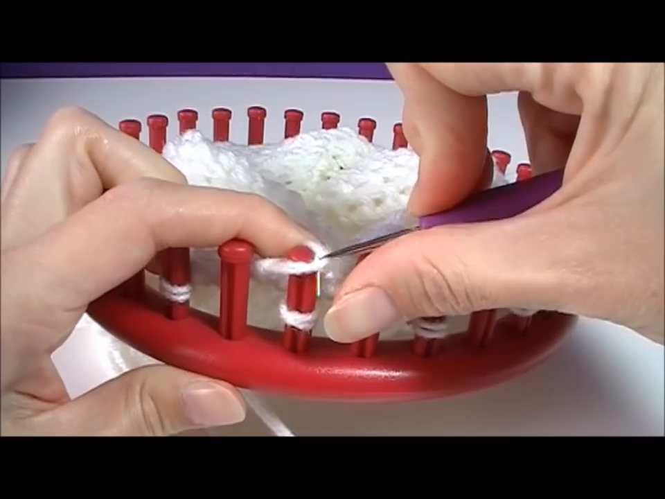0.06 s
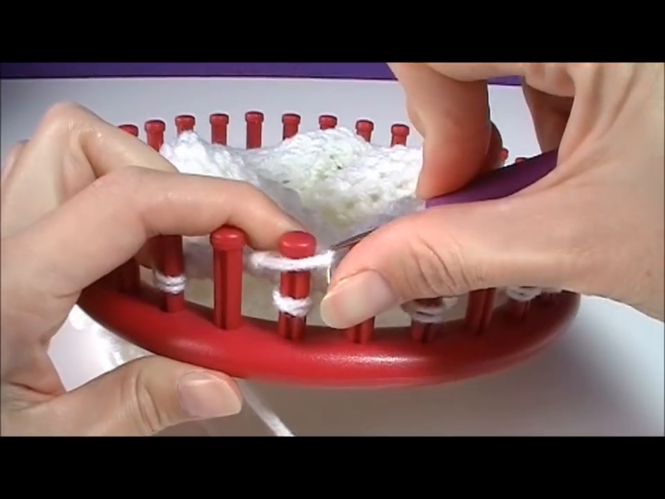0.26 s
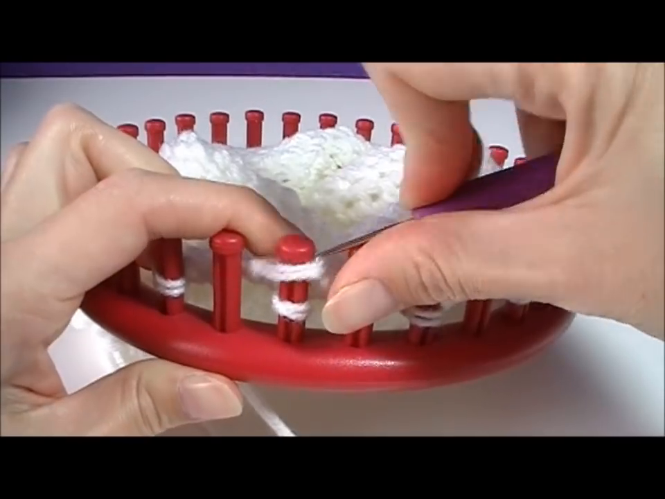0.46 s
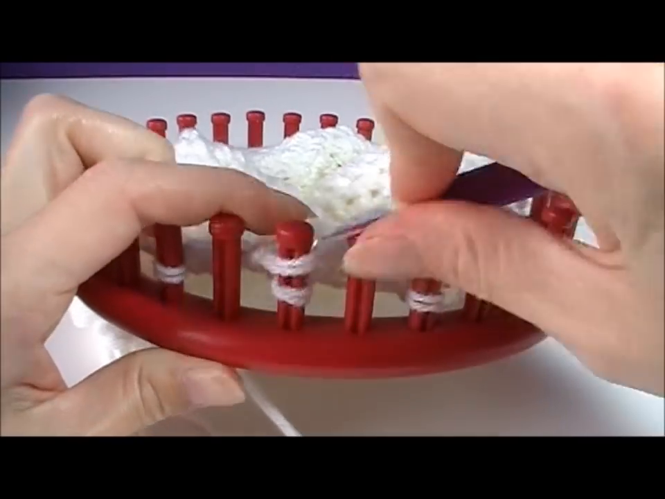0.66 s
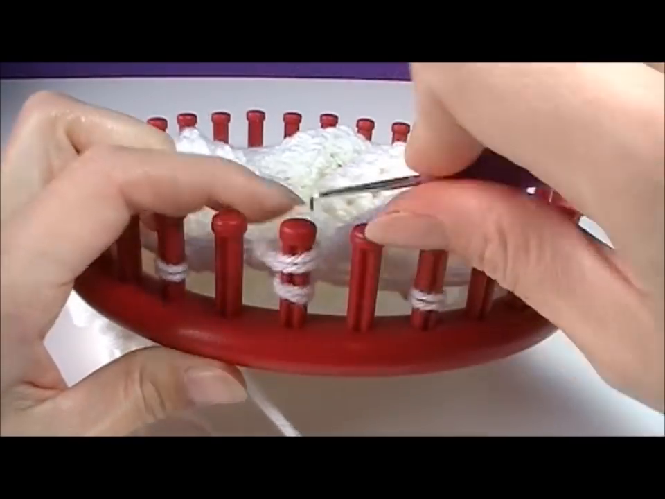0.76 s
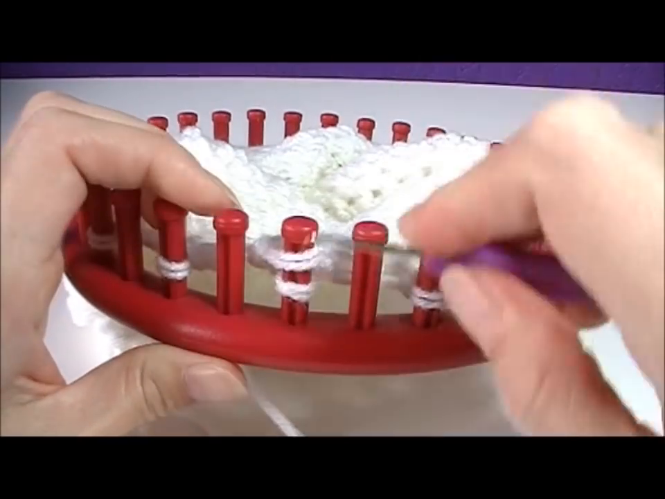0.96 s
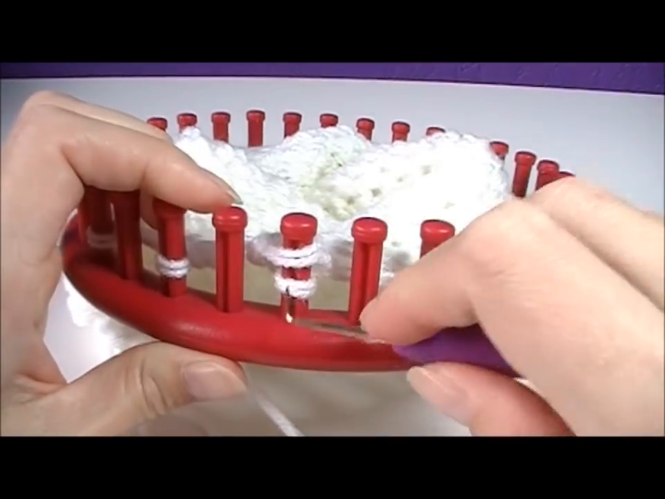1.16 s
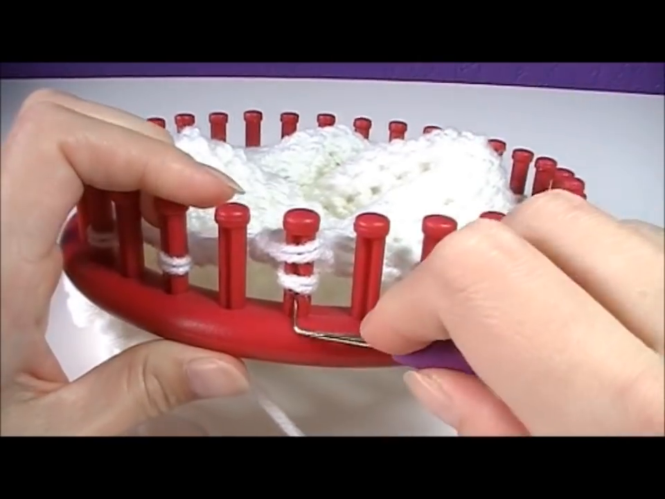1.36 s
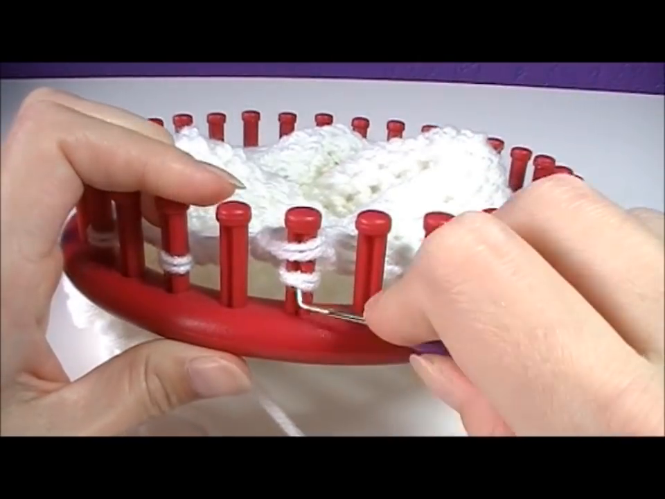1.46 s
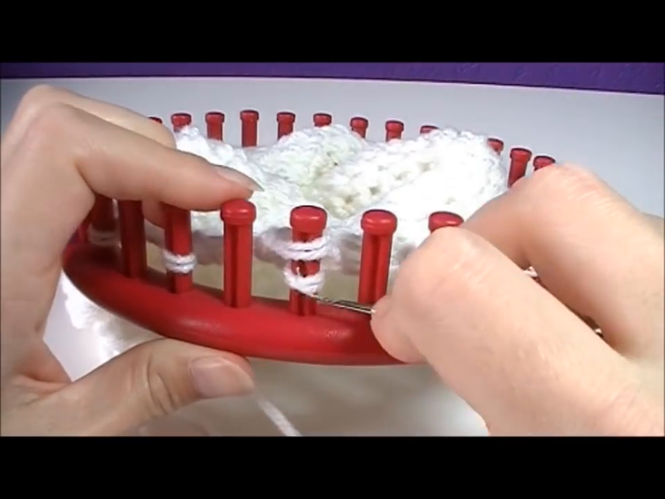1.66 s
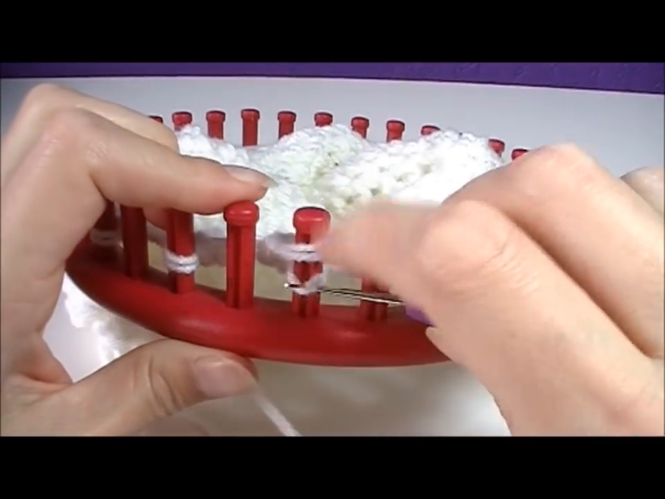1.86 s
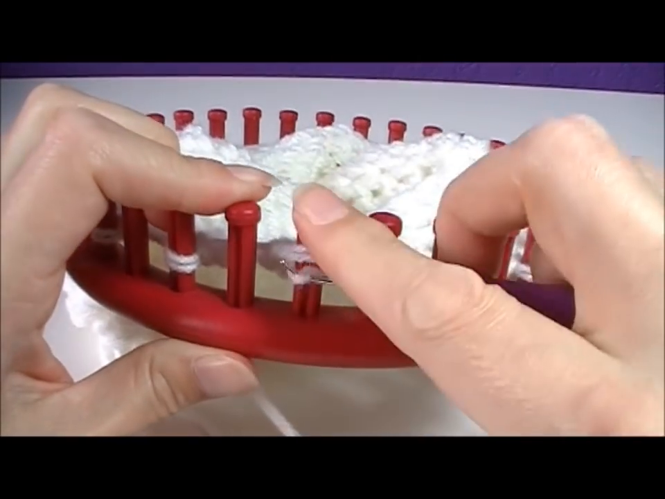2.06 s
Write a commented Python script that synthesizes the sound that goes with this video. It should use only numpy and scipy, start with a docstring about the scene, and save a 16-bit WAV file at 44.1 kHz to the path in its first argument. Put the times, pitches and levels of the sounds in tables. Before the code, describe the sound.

A metal hook clicks on plastic loom pegs, with hollow knocks and faint yarn rubbing.

```python
"""Knitting loom, close up

A small, quiet room, the microphone close to a plastic loom. A metal hook lifts yarn loops over the
pegs, snapping off them and ticking against them; the hollow ring knocks and booms under the hands.
Yarn hisses as it rubs over pegs and fingers, and the hook scrapes once along a groove."""
import sys
import numpy as np
from scipy import signal
from scipy.fft import rfft, irfft, next_fast_len
from scipy.io import wavfile
from scipy.ndimage import map_coordinates

SR = 44100
rng = np.random.default_rng(int(sys.argv[2]) if len(sys.argv) > 2 else 0)


def persist_wave(psi):
    """Save psi, clipped to +-1, as 16-bit WAV."""
    counts = np.round(np.clip(psi, -1, 1) * 32767).astype(np.int16)
    wavfile.write(sys.argv[1], SR, np.atleast_2d(counts).T)


N = 92610  # 2.1 s


def amp(db):
    """Decibels to gain."""
    return 10 ** (np.asarray(db) / 20)


def unit_rms(x):
    """Scale to rms 1."""
    return x / np.sqrt(np.mean(x ** 2) + 1e-20)


def along(points, hz):
    """Read (f/Hz, value) points on a log frequency axis."""
    freqs, values = np.transpose(points)
    return np.interp(np.log(hz + 1), np.log(np.abs(freqs) + 1), values)


def curve(points):
    """Join (t/s, value) points sample by sample, holding the end values."""
    return np.interp(np.arange(N) / SR, *np.transpose(points))


def wobble(per_s):
    """A smooth random curve with per_s knots a second."""
    return map_coordinates(rng.standard_normal(N), [np.arange(N) * per_s / SR], mode="wrap")


def filtered(x, response):
    """Shape x by a response given as a function of frequency."""
    n = x.shape[-1]
    padded = next_fast_len(2 * n)
    return irfft(rfft(x, padded) * response(np.fft.rfftfreq(padded, 1 / SR)), padded)[..., :n]


def pan(db):
    """Gains that put the left channel db above the right."""
    return amp(np.array([[db], [-db]]) / 2)


def add(track, start_s, sound):
    """Mix a sound in at start_s."""
    part = track[:, max(0, round(start_s * SR)):][:, :sound.shape[-1]]
    part += sound[..., :part.shape[1]]


def noise(colour, alike):
    """Stereo noise of rms 1, from colour (f/Hz, level/dB) and alike (f/Hz, left-right correlation)."""
    def mid_side_gains(hz):
        angle = np.arccos(np.clip(along(alike, hz), -1, 1)) / 2
        return amp(along(colour, hz)) * [np.cos(angle), np.sin(angle)]
    mid, side = filtered(rng.standard_normal((2, N)), mid_side_gains)
    return unit_rms(np.array([mid + side, mid - side]))


# room tone at the microphone: f/Hz, level/dB
ROOM_COLOUR = [(25, -2), (55, -10), (110, 2.5), (170, -8.5), (250, 3), (400, -6), (800, -5.5),
               (1700, -12.5), (3500, -19), (7000, -25), (12000, -33.5), (15500, -28.5)]
# its likeness across the stereo pair: f/Hz, correlation
ROOM_ALIKE = [(60, -0.36), (240, -0.81), (950, -0.87), (3770, -0.17), (15000, -0.42)]
def room_tone():
    """The small room's steady, low background noise."""
    return amp(-48) * noise(ROOM_COLOUR, ROOM_ALIKE) * pan(db=1.3)


def fibre_friction(colour, alike):
    """Fibres catch and slip, giving their hiss a fine grain."""
    flutter_db = 2 * wobble(per_s=700)
    return unit_rms(amp(flutter_db) * noise(colour, alike))


# yarn sliding over the pegs, close up: t/s, level/dB
SLIDE_LEVEL = [(0, -53), (.13, -56.5), (.18, -53.5), (.24, -46), (.32, -58), (.42, -76), (.48, -59),
               (.56, -57), (.75, -53.5), (.81, -59.5), (.95, -52.5), (1.1, -61), (1.35, -60.5), (1.45, -60),
               (1.55, -57.5), (1.76, -56), (1.85, -52.5), (1.91, -58), (1.99, -53), (2.1, -49)]
# its spectrum: f/Hz, level/dB
SLIDE_COLOUR = [(300, -4), (1000, 3), (2000, -2), (3500, 0.5), (6000, -2.5), (9000, -3.5), (12000, -2),
                (15500, -5)]
def yarn_slide():
    """Yarn rubs on the plastic with a broad, grainy hiss."""
    hiss = fibre_friction(SLIDE_COLOUR, alike=[(1000, 0.19), (10000, 0.28)])
    return amp(0.5 + curve(SLIDE_LEVEL)) * hiss * pan(db=1.5)


# hands on the ring, just left of centre: t/s, level/dB
HAND_LEVEL = [(0, -55), (.2, -50.5), (.42, -61.5), (.6, -52.5), (.72, -54), (.9, -57), (1.15, -55),
              (1.3, -58), (1.5, -50.5), (1.6, -52.5), (1.78, -50), (1.92, -50.5), (2.0, -50), (2.1, -55.5)]
# their spectrum: f/Hz, level/dB
HAND_COLOUR = [(30, -26), (70, -2), (120, 1.5), (200, -1), (270, -6), (350, -4.5), (550, -13), (800, -17),
               (1400, -24), (4000, -49)]
def hand_rumble():
    """Fingers shift on the ring with an uneven low rumble."""
    level_db = curve(HAND_LEVEL) + 2.3 * wobble(per_s=35)
    return amp(level_db) * noise(HAND_COLOUR, alike=[(100, 0), (800, 0)]) * pan(db=2)


# decay of the small room: f/Hz, t60/s
ROOM_DECAY = [(150, 0.16), (1000, 0.22), (5000, 0.17), (14000, 0.095)]
def in_room(sound, wet_db):
    """The direct sound reaches the microphone with a short tail from the walls."""
    hz, t, spectra = signal.stft(rng.standard_normal((2, SR // 3)), SR, nperseg=256)
    tail = signal.istft(spectra * amp(-60 * t / along(ROOM_DECAY, hz)[:, None]), SR)[1]
    tail /= np.linalg.norm(tail[0])
    heard = amp(wet_db) * signal.fftconvolve(sound.mean(0)[None], tail, axes=1)
    add(heard, 0, sound)
    return heard


# knocks on the ring, left of the microphone:
# t/s, boom level/dB, dull above f/Hz, thin below f/Hz, share of free decay, thud level/dB, thud f/Hz
RING_KNOCKS = [(.001, -33.5, 900, 80, 0.52, -39, 418), (0.2333, -24, 1400, 60, 0.083, -22, 336),
               (0.2394, -14.5, 1000, 70, 0.84, -21.5, 430), (0.5061, -28.5, 775, 133, 0.79, -33.5, 437),
               (0.7742, -25.5, 780, 173, 0.73, -32, 444), (1.235, -42.5, 300, 130, 0.5, -39, 244),
               (1.562, -33.5, 363, 95, 1, -45, 130), (1.6202, -32, 370, 190, 0.54, -36, 192),
               (1.672, -27, 520, 199, 0.48, -28.5, 213), (1.694, -30, 338, 166, 0.35, -40, 168),
               (1.7225, -28, 756, 280, 0.51, -40, 332), (1.756, -32, 700, 230, 0.5, -33.5, 312),
               (1.779, -35.5, 300, 80, 0.6, -49, 130), (1.820, -38.5, 340, 90, 0.74, -43, 152),
               (1.9862, -31.5, 333, 79, 0.24, -36.5, 96), (2.007, -45, 250, 60, 0.33, -37, 94)]
# modes of the free ring: f/Hz, level/dB, t60/s
RING_MODES = [(85, -3, 0.08), (127.7, 1, 0.36), (173.5, -14, 0.28), (223, -13.5, 0.075), (321.7, -4, 0.21),
              (382.8, -4.5, .17), (424.6, -11.5, 0.36), (461.4, -5, 0.2), (486, -10.5, 0.19),
              (537, -13.5, 0.06), (738, -0.5, 0.038), (859, -9.5, 0.09), (937, -6.5, 0.065),
              (1202, -13, 0.071)]
BOOM_GAIN_DB, KNOCK_ATTACK_S = -10, 0.00017
THUD_CYCLES = 4.9  # swings in which a thud falls 60 dB
GRIP_SAG = 0.046  # share by which a full grip lowers the ring's pitches
def ring_knocks():
    """The hollow ring thuds and booms; soft contacts are dull, a firm grip shortens and lowers the boom."""
    out, t = np.zeros((2, N)), np.arange(SR // 2) / SR
    hz, db, t60 = np.transpose(RING_MODES)[:, :, None]
    sign = (-1) ** np.arange(len(RING_MODES))[:, None]  # neighbouring modes swing against each other
    radiation = signal.butter(2, 75, "high", fs=SR, output="sos")
    attack = 1 - np.exp(-t / KNOCK_ATTACK_S)
    for start_s, boom_db, dull_hz, thin_hz, decay_share, thud_db, thud_hz in RING_KNOCKS:
        excitation = 1 / np.sqrt((1 + (hz / dull_hz) ** 4) * (1 + (thin_hz / hz) ** 4))
        phase = rng.normal(0, 0.92, hz.shape)
        held_hz = hz * (1 - GRIP_SAG * (1 - decay_share))
        envelopes = amp(BOOM_GAIN_DB + boom_db + db - 60 * t / (t60 * decay_share))
        boom = (sign * excitation * envelopes * np.cos(2 * np.pi * held_hz * t + phase)).sum(0)
        thud = amp(thud_db - 60 * t * thud_hz / THUD_CYCLES) * np.sin(2 * np.pi * thud_hz * t)
        knock = signal.sosfilt(radiation, (boom + thud) * attack)
        add(out, start_s, in_room(pan(db=7.5) * knock, wet_db=-7.5))
    return out


# taut yarn drawn across hook and fingertips: t/s, level/dB
TAUT_LEVEL = [(.12, -78), (.19, -48.5), (.25, -63), (.33, -70), (.45, -63), (.50, -58), (.64, -54),
              (.77, -57.5), (.81, -85), (1.72, -81), (1.83, -57), (1.90, -73), (1.98, -53), (2.1, -49.5)]
# its spectrum: f/Hz, level/dB
TAUT_COLOUR = [(6000, -28), (8500, -4), (10200, 1), (11800, -1.5), (13000, 0), (14000, -5), (15500, -10)]
def taut_yarn():
    """Yarn under tension slips faster and hisses high above the rest."""
    return amp(curve(TAUT_LEVEL)) * fibre_friction(TAUT_COLOUR, alike=[(10000, 0.32)])


# hook on peg, close to the microphone:
# t/s, level/dB, brightest f/Hz, colour width/octaves, left over right/dB, left lead/ms
HOOK_CONTACTS = [(0.2318, -21, 10000, 1.1, 2, 0), (0.233, -13, 8000, 9.5, -4, 0),
                 (0.2366, 0, 7700, 2.28, 4.5, 0.022), (0.501, -3.5, 7260, 0.21, 4.5, -0.037),
                 (0.5011, -13, 5800, 0.21, 5, 0), (0.5016, -13.5, 2900, 0.3, -4, 0.085),
                 (0.562, -31.5, 10940, 0.84, 1, 0), (0.5705, -33, 13000, 0.74, 3, 0),
                 (0.699, -25.5, 4950, 1.5, 10, 0), (0.7551, -28.5, 2900, 1.2, 2, 0),
                 (1.3107, -31, 11900, 2, -6, 0), (1.385, -29, 3860, 1.26, 2, 0),
                 (1.4767, -37, 7000, 1, 1, 0), (1.588, -32.5, 14000, 1.06, -4, -0.02),
                 (1.8261, -30, 13000, 1.1, .5, 0), (2.0060, -16.5, 13800, 0.49, 7.5, 0),
                 (2.0104, -27, 11900, 0.37, 4, 0)]
# modes of hook and peg: f/Hz, level/dB, t60/s
PEG_MODES = [(1426, -7, 0.025), (2340, -14, 0.012), (3230, -9.5, 0.026), (3410, -8, 0.014),
             (4290, -7, 0.025), (4690, -7, 0.021), (5430, -5, 0.0081), (6610, -7, 0.014), (7700, -4, 0.017),
             (8240, -2.5, 0.0061), (9130, 0.5, 0.0061), (10120, 3.5, 0.0059), (11130, -2, 0.015),
             (13400, 0, 0.0051), (14300, -35, 0.0061)]
CRACK_DB, CRACK_T60_S = -0.5, 0.01
CLICK_GAIN_DB, COLOUR_DEPTH_DB = -6, 20.5
def hook_clicks():
    """Each contact cracks and rings hook and peg; where it lands decides which pitches stand out."""
    out, t = np.zeros((2, N)), np.arange(SR // 20) / SR
    hz, db, t60 = np.transpose(PEG_MODES)[:, :, None]
    for start_s, level_db, bright_hz, width_octaves, pan_db, lead_ms in HOOK_CONTACTS:
        modes = amp(db - 60 * t / t60) * np.sin(2 * np.pi * (hz * t + rng.random(hz.shape)))
        ringing = modes.sum(0) / np.linalg.norm(amp(db))
        crack = amp(CRACK_DB - 60 * t / CRACK_T60_S) * rng.standard_normal(len(t))
        lead_s = np.array([[lead_ms], [-lead_ms]]) / 2000  # half to each channel

        def colour_and_lead(f):
            bell = np.exp(-0.5 * (np.log2((f + 1) / bright_hz) / width_octaves) ** 2)
            return amp(COLOUR_DEPTH_DB * (bell - 1)) * np.exp(2j * np.pi * f * lead_s)
        click = amp(CLICK_GAIN_DB + level_db) * filtered(ringing + crack, colour_and_lead)
        add(out, start_s, in_room(pan(pan_db) * click, wet_db=-11))
    return out


# a loop squeezed up a peg: t/s, level/dB
RASP_LEVEL = [(.61, -87), (.645, -61), (.668, -50.5), (.685, -67), (.75, -58), (.79, -79)]
# its spectrum: f/Hz, level/dB
RASP_COLOUR = [(1000, -18), (2600, -9), (3500, 2), (4600, -15), (7000, -13), (12000, -29)]
def loop_rasp():
    """A tight loop rasps softly as it is drawn up its peg."""
    return amp(curve(RASP_LEVEL)) * fibre_friction(RASP_COLOUR, alike=[(1000, 0.67)])


# hook in a groove, centred on the microphone: t/s, level/dB
GROOVE_LEVEL = [(1.40, -59), (1.43, -54.5), (1.45, -44.5), (1.478, -45.5), (1.49, -55.5), (1.52, -59)]
# its spectrum: f/Hz, level/dB
GROOVE_COLOUR = [(300, -4), (550, 2.5), (740, 9), (1000, -2), (1700, -2), (2300, 3), (3500, -5),
                 (6000, -10), (9500, -6.5), (15000, -14)]
def groove_scrape():
    """The hook's tip stutters once along a peg's groove, rising out of a faint, constant hiss."""
    stutter_db = 0.59 * wobble(per_s=500)
    slips = unit_rms(amp(stutter_db) * noise(GROOVE_COLOUR, alike=[(1000, 0.18)]))
    return amp(curve(GROOVE_LEVEL)) * slips


def scene():
    """Close work on the loom over the room tone."""
    contacts = hook_clicks() + ring_knocks()
    rubbing = yarn_slide() + taut_yarn() + loop_rasp() + hand_rumble() + groove_scrape()
    return contacts + rubbing + room_tone()


# microphone response: f/Hz, level/dB
MIC_RESPONSE = [(20, 1.5), (100, 1), (12000, 0.5), (15000, -5.5), (16300, -16)]
BAND_LIMIT_HZ = 16300
def record(dry):
    """The microphone dulls the very top and passes nothing above its band limit."""
    return filtered(dry, lambda hz: amp(along(MIC_RESPONSE, hz)) * (hz < BAND_LIMIT_HZ))


dry = scene()
out = record(dry)
persist_wave(out)
```